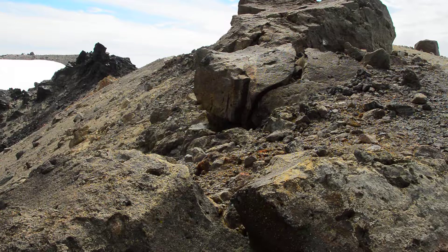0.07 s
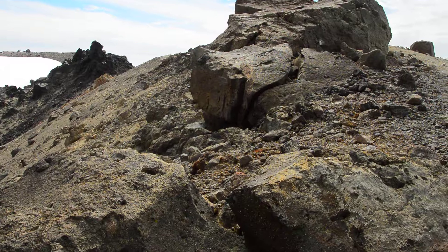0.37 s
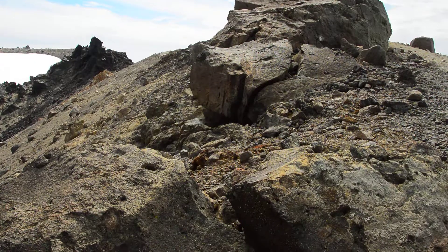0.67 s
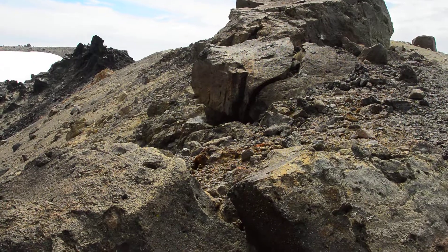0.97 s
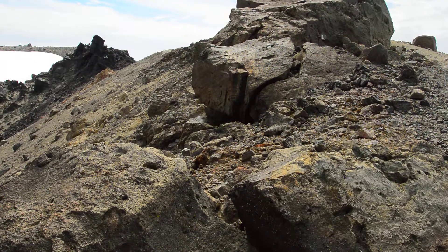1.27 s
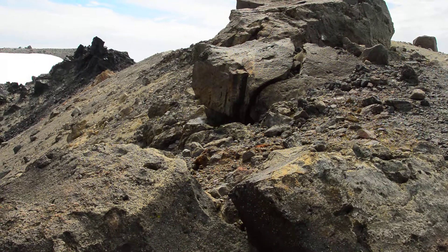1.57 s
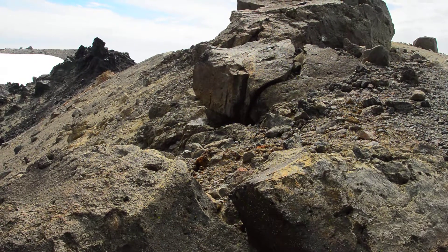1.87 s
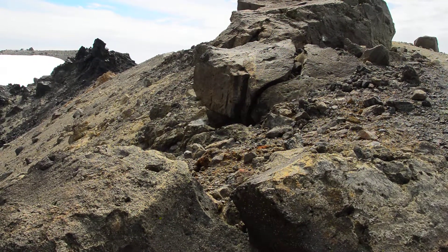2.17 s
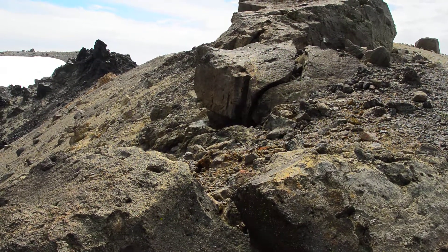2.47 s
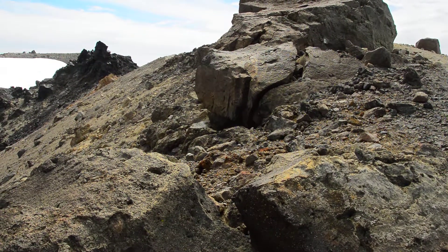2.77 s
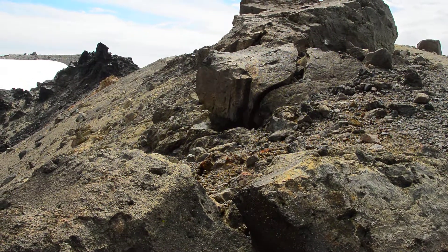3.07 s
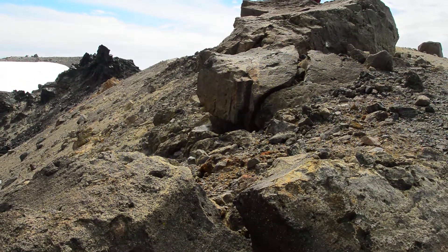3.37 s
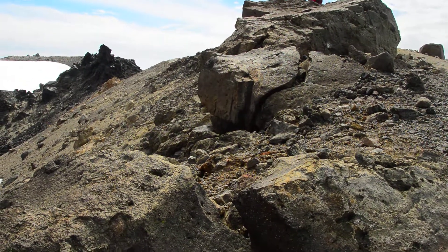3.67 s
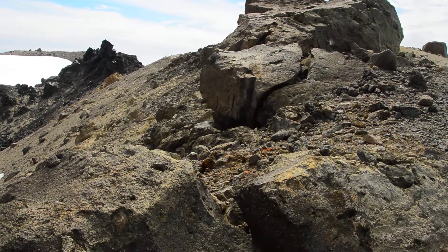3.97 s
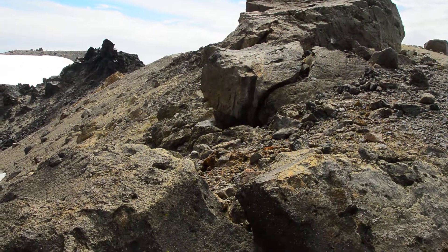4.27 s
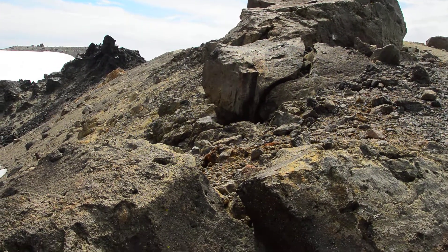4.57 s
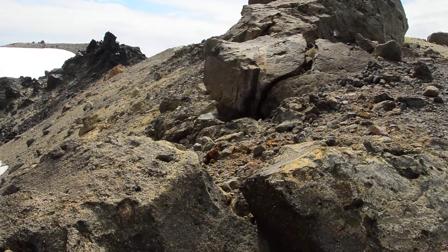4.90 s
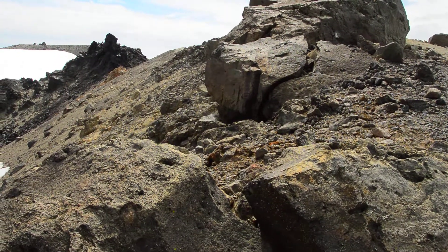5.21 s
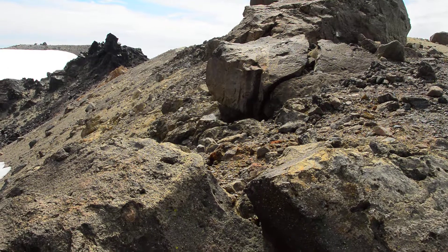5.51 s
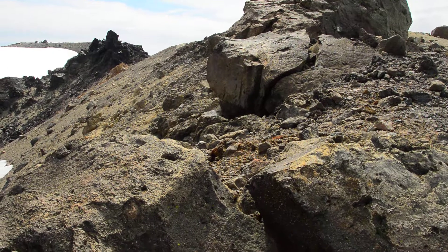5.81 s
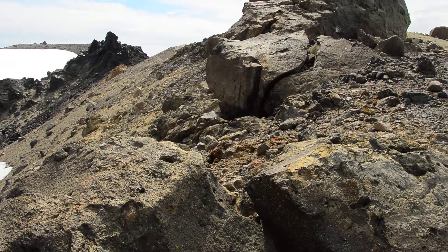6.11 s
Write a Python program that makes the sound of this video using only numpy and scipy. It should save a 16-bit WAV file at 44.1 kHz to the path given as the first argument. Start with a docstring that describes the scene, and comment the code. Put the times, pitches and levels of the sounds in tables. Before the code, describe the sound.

On an open rocky slope, wind blows directly on the microphone with a low, uneven rumble. It starts softly, surges into a thumping gust about two seconds in, then returns in quick bursts that grow toward a sharp, overloading pop. Close, faint camera noise continues throughout: hiss, a whirr and a wavering high whine. A few faint ticks come in the first half.

```python
"""A low, gusty rumble that brightens as it swells: wind right on a camera's microphone, out on a bare
mountain slope. Single eddies thump the microphone port, and the hardest of them overloads it.
Underneath, close up, are the camera's own hiss, whirr and thin high whine, and a few faint ticks.
The sound fades in."""
import sys
import numpy as np
from scipy import signal
from scipy.fft import rfft, irfft, next_fast_len
from scipy.io import wavfile
from scipy.ndimage import map_coordinates

SR = 44100
rng = np.random.default_rng(int(sys.argv[2]) if len(sys.argv) > 2 else 0)


def to_wav(sig):
    """Store sig (one row per channel, or 1-D mono) as 16-bit WAV at the path in sys.argv[1].

    Samples outside -1..1 are clipped; the rate is SR.
    """
    pcm = np.clip(np.atleast_2d(sig), -1, 1) * 32767
    pcm = np.round(pcm).astype(np.int16)
    wavfile.write(sys.argv[1], SR, pcm.T)  # frames by channels


N = 275625


def wind(rumble_db=-1.41, rumble_lumps_db=2.54, flutter_lumps_db=3.0, burst_db=2.4):
    """Wind on the microphone: large eddies rumble, small ones flutter in quick, uneven bursts."""
    # Spectra of the large and the small eddies. Each row: frequency in Hz, relative density in dB.
    rumble_colour = [(12, -27), (25, -5), (42, -1.5), (78, 2), (125, -2), (190, -7.5), (280, -23),
                     (450, -34.5), (900, -80)]
    flutter_colour = [(60, -38), (130, 0), (200, 1.5), (290, -2), (420, -10.5), (650, -19.5), (1000, -29.5),
                      (1600, -43.5), (3500, -65)]
    strength_db = wind_strength()
    # Flutter grows faster than the wind and would draw level at equal_db, so gusts sound brighter.
    equal_db, growth = 17.5, 1.253
    flutter_db = equal_db + growth * (strength_db - equal_db)
    lumps = wobble(40)  # shared, so both layers surge together
    rumble = turbulence(rumble_colour, span_s=0.25) * unit(amp(rumble_lumps_db * lumps))
    flutter = turbulence(flutter_colour, span_s=0.28)
    flutter *= unit(amp(flutter_lumps_db * lumps + burst_db * wobble(130)))
    return rumble * amp(strength_db + rumble_db) + flutter * amp(flutter_db)


def wind_strength():
    """Wind level at the microphone in dB: bell-shaped puffs add their power to the slow flow."""
    # Flow over the slope, one long gust and a later build-up. Each row: time in seconds, level in dB.
    flow = [(.35, -39.5), (.8, -43.5), (1.35, -47.5), (2.0, -45), (2.29, -25), (2.33, -18), (2.72, -17.5),
            (2.82, -32), (3.2, -28.5), (3.33, -38), (3.62, -41.5), (4.2, -38), (4.6, -33), (4.82, -37.5),
            (5.5, -32.5), (5.95, -20), (6.04, -34.5), (6.25, -33)]
    # Short puffs. Each row: crest time in seconds, level in dB, length in seconds.
    puffs = [(0.315, -32, 0.065), (0.521, -27.5, 0.051), (0.64, -38, 0.036), (0.948, -34, 0.14),
             (1.48, -38, 0.052), (1.62, -39.5, .1), (2.639, -20, 0.035), (3.154, -25.5, 0.15),
             (3.466, -28.5, 0.061), (3.784, -28, 0.093), (3.99, -30.5, 0.059), (4.318, -24, 0.049),
             (4.41, -26.5, 0.052), (4.73, -30, 0.077), (4.929, -29, 0.056), (5.042, -31.5, 0.044),
             (5.196, -26.5, 0.046), (5.363, -23, 0.09), (5.467, -27, 0.024), (5.572, -22, 0.068),
             (5.813, -25.5, 0.081)]
    t = np.arange(N) / SR
    puff_power = sum(amp(db) ** 2 * bell(t, crest, length / 2) for crest, db, length in puffs)
    return 10 * np.log10(amp(curve(flow)) ** 2 + puff_power)


def turbulence(colour, span_s):
    """Churning air: noise with its chance swells evened out, so that the gusts set its strength."""
    air = noise(colour)
    power = signal.fftconvolve(air ** 2, signal.windows.hann(int(span_s * SR) + 3), "same")
    return unit(air / np.sqrt(np.abs(power) + 1e-9))


def eddies(wake_db=-20, wake_cycles=0.65):
    """An eddy hits the port: one push between two troughs of suction, then a short ragged wake."""
    # Single eddies. Each row: crest time in seconds, peak of the push in dB, centre frequency in Hz,
    # roundness (2 is a sharp snap, 10 a soft double swing).
    hits = [(.531, -34, 395, 3.3), (2.337, -11, 159, 6.3), (2.354, -21.5, 440, 6.2),
            (2.519, -18.5, 460, 5.5), (2.587, -14, 245, 2.6), (2.708, -11, 265, 5.6),
            (3.802, -25.5, 304, 2.9), (4.006, -26.5, 198, 8.1), (4.299, -17, 121, 8.6),
            (4.307, -19, 276, 4), (4.406, -18, 242, 14), (4.439, -24.5, 256, 18), (5.453, -22, 262, 11),
            (5.587, -9.5, 167, 5.8), (5.9028, 1.5, 258, 1.44), (5.9042, -7, 736, 5),
            (5.9068, -7.5, 390, 1.6)]
    out = np.zeros(N + SR)
    t = np.arange(-SR // 10, SR // 10) / SR
    for crest, db, hz, roundness in hits:
        # A small fast eddy passes sooner and sounds higher; a round one has little treble.
        push = np.real((1 - 2j * np.pi * hz * t / roundness) ** -(roundness + 1))
        band = signal.butter(2, [hz / 2, hz * 1.5], "band", fs=SR, output="sos")
        swirl = unit(signal.sosfilt(band, rng.standard_normal(len(t))))
        age = np.maximum(t, 0) * hz / wake_cycles
        wake = amp(wake_db) * swirl * age * np.exp(1 - age)
        start = round((crest + t[0]) * SR)
        out[start:start + len(t)] += amp(db) * (push + wake)
    return out[:N]


def camera(hiss_db=-51.0, whirr_db=-58.0, tones_db=0.7, waver_db=0.5, drift_rad=1.14, whine_hz=15647):
    """The camera's own noise, close up: hiss, a resonant whirr, unsteady tones and a wavering whine."""
    # Steady hiss. Each row: frequency in Hz, relative density in dB.
    hiss_colour = [(15, 1), (35, 28.5), (80, 19), (200, 4.5), (450, 4), (900, 4.5), (1500, 3.5), (2500, -2),
                   (4400, -5.5), (8000, -7), (15800, -10.5)]
    # Resonances of the whirr. Each row: centre in Hz, width in Hz, relative level in dB.
    resonances = [(2075, 110, 2), (2345, 100, -1), (2700, 90, -5), (2870, 100, -4), (3125, 130, 4),
                  (3700, 190, -2.5), (3950, 190, -4), (4670, 160, -3), (9650, 450, -15), (11900, 260, -9),
                  (15300, 620, -8)]
    # Faint tones. Each row: frequency in Hz, relative level in dB.
    tone_levels = [(2082, -71.5), (2920, -75), (3122, -76), (3756, -76), (4597, -81), (5428, -87),
                   (11891, -81), (12726, -86)]
    # The high whine. Each row: time in seconds, rms level in dB.
    whine_levels = [(0.5, -50.5), (1.12, -47), (2.71, -50.5), (2.8, -47), (3.05, -50), (3.78, -52),
                    (4.78, -51), (4.93, -48.5), (6.25, -48.5)]

    def whirr_response(f):
        powers = (amp(db) ** 2 / (1 + (2 * (f - hz) / width) ** 4) for hz, width, db in resonances)
        return np.sqrt(sum(powers))

    t = np.arange(N) / SR
    whirr = amp(whirr_db) * unit(filtered(rng.standard_normal(N), whirr_response))
    tones = np.zeros(N)
    for hz, db in tone_levels:
        level = amp(tones_db + db + waver_db * wobble(12))
        tones += level * np.sin(2 * np.pi * hz * t + drift_rad * wobble(20))
    whine = amp(curve(whine_levels)) * np.sin(2 * np.pi * whine_hz * t)
    hiss = amp(hiss_db) * noise(hiss_colour)
    return hiss + whirr + np.sqrt(2) * (tones + whine)


def ticks(life_s=0.0008, spread=0.29, body_hz=2500, body_width_hz=870, crest_factor_db=5.5):
    """Faint dry ticks, each a millisecond or two of bright noise over a duller body."""
    # The ticks. Each row: time in seconds, rough peak level in dB, centre of the crisp part in Hz,
    # how far the body lies under that part in dB.
    clicks = [(1.563, -42, 4500, 12), (2.3105, -38, 8500, -1), (2.3245, -39, 8450, -6)]
    t = np.arange(N) / SR
    out = np.zeros(N)
    for at, db, hz, under_db in clicks:
        colour = lambda f: bell(f, hz, spread * hz) + amp(-under_db) * bell(f, body_hz, body_width_hz)
        band = unit(filtered(rng.standard_normal(N), colour))
        out += amp(db - crest_factor_db) * band * bell(t, at, life_s)
    return out


def amp(db):
    """Decibels to gain."""
    return 10 ** (np.asarray(db) / 20)


def unit(x):
    """Scale to rms 1."""
    return x / np.sqrt(np.mean(x ** 2) + 1e-20)


def bell(x, centre, width):
    """A bell curve of height 1 that falls to 1/e one width from its centre."""
    return np.exp(-np.minimum(((x - centre) / width) ** 2, 50))


def curve(rows):
    """Rows of time in seconds and value, joined by straight lines, one value per sample."""
    return np.interp(np.arange(N) / SR, *np.transpose(rows))


def wobble(rate):
    """A smooth random curve, rate knots a second."""
    return map_coordinates(rng.standard_normal(int(N * rate / SR) + 4), [np.arange(N) * rate / SR])


def filtered(x, response):
    """x with its spectrum multiplied by a function of frequency in Hz."""
    size = next_fast_len(N + SR // 2)
    return irfft(rfft(x, size) * response(np.fft.rfftfreq(size, 1 / SR)), size)[:N]


def noise(colour):
    """Noise of rms 1 whose spectrum joins rows of Hz and dB on a log frequency axis."""
    hz, db = np.transpose(colour)
    response = lambda f: amp(np.interp(np.log(f + 1), np.log(hz), db))
    return unit(filtered(rng.standard_normal(N), response))


def scene():
    """One microphone on the slope: wind on its port over the camera's own noise."""
    return (wind() + eddies() + ticks() + camera())[None]


def record(dry, fade_s=0.42, fade_power=2.4, top_hz=15780):
    """The camera fades in, clips at full scale and keeps nothing above its band limit."""
    fade = np.minimum(np.arange(N) / SR / fade_s, 1) ** fade_power
    clipped = np.clip(fade * dry[0], -1, 1)
    return filtered(clipped, lambda f: f < top_hz)[None]


dry = scene()
out = record(dry)
to_wav(out)
```